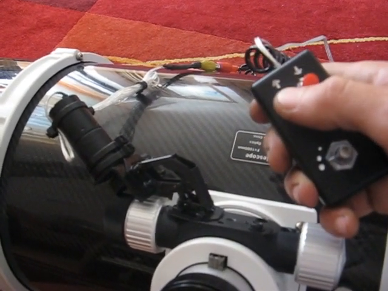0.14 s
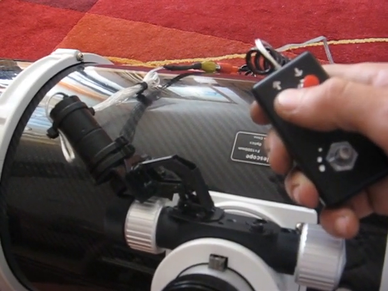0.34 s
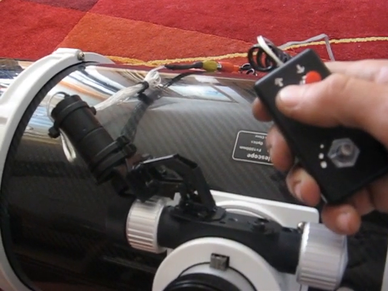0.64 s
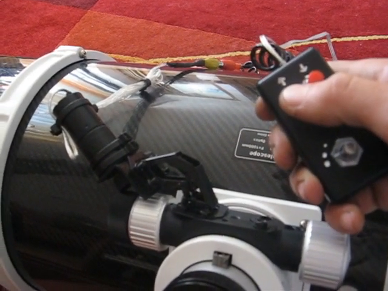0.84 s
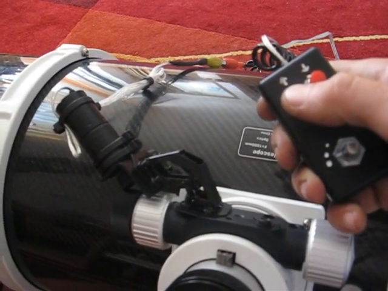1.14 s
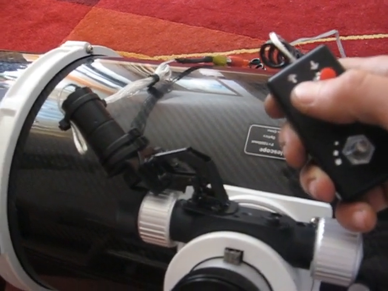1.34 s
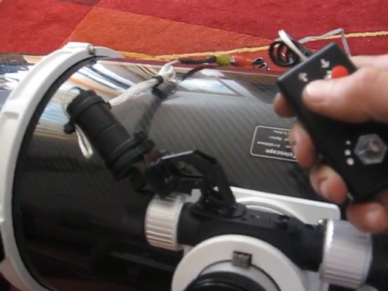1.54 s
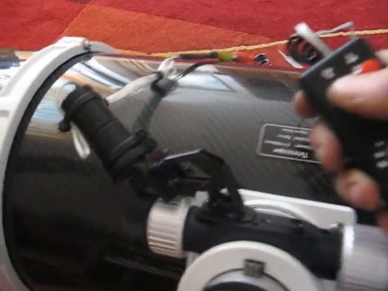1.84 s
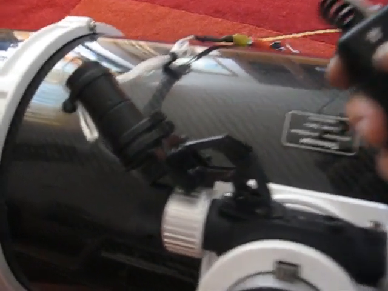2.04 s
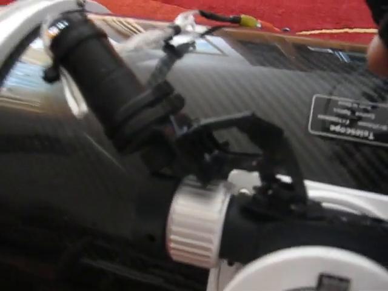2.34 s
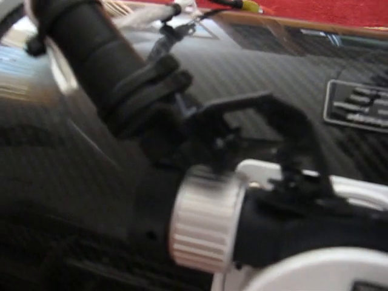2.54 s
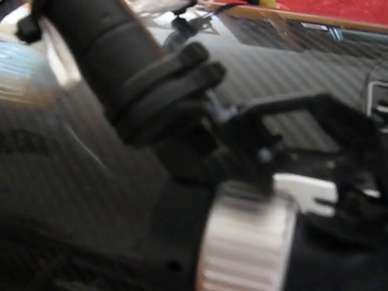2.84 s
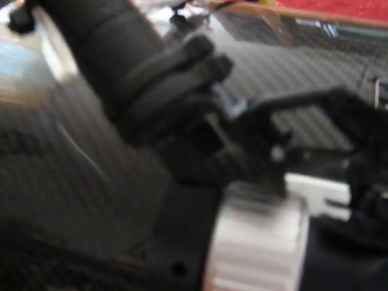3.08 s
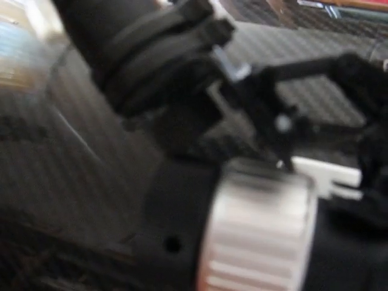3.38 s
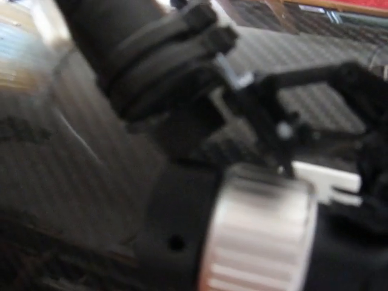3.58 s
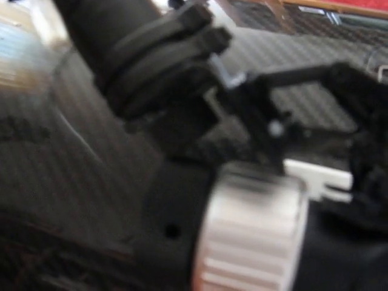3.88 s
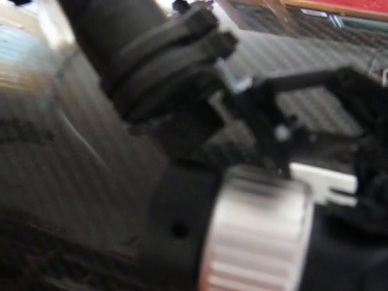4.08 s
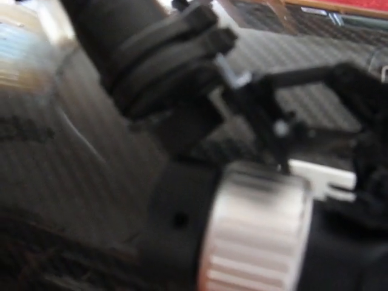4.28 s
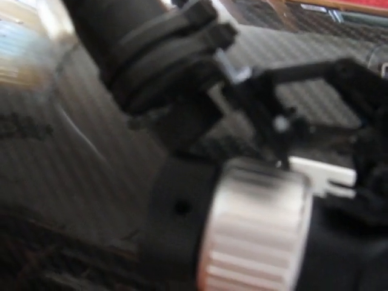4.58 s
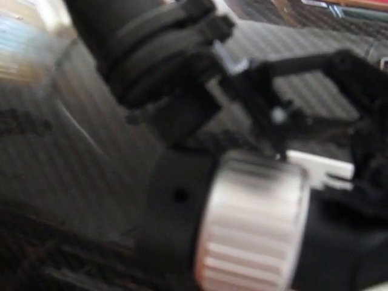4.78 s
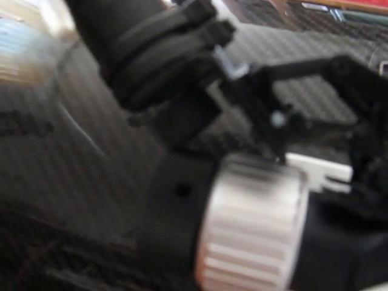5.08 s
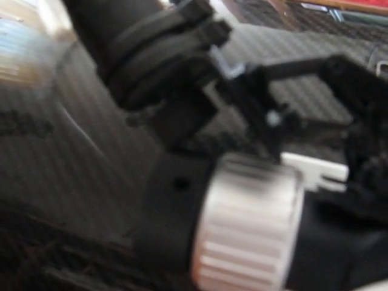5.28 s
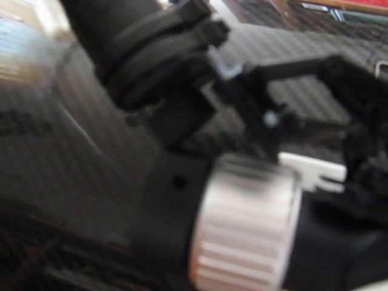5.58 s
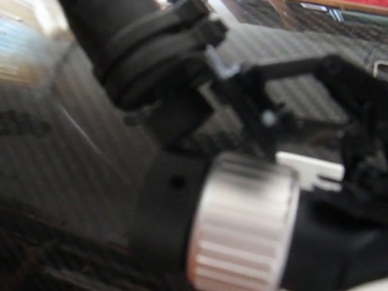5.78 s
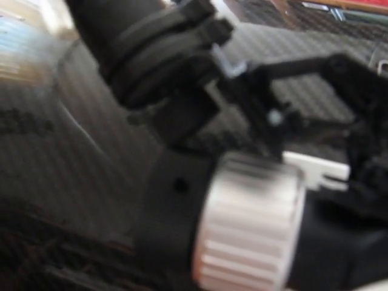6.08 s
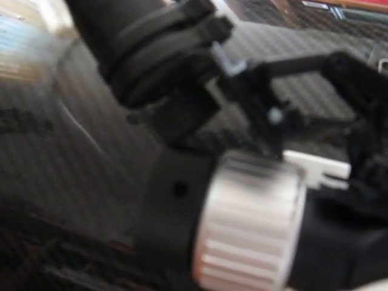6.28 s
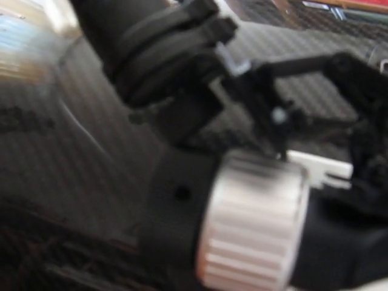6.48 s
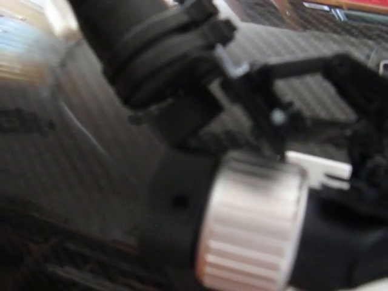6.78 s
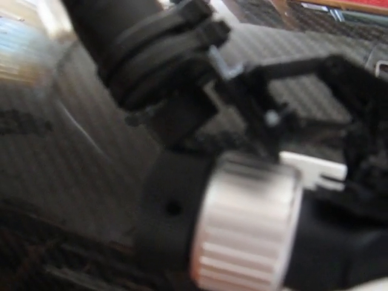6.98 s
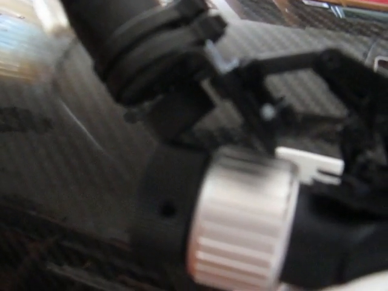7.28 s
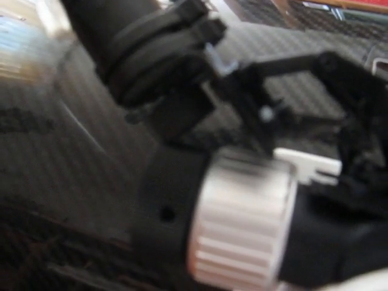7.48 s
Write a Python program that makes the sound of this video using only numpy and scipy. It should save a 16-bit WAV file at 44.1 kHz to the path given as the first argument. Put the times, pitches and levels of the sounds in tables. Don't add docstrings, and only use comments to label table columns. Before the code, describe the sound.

A little electric gearmotor buzzes beside a telescope tube, its plastic housing rattling rapidly over a steady gear whine. The microphone moves closer and the whir gets louder and fuller. A hard click stops it, smaller clicks follow in near silence, then the motor runs the other way with a drier, hissier rattle. A last bright click ends the run. Indoors, no audible room echo, crude gritty mono sound with broken faint tails.

```python
import sys
import numpy as np
from scipy import signal
from scipy.fft import rfft, irfft
from scipy.io import wavfile

SR = 44100
rng = np.random.default_rng(int(sys.argv[2]) if len(sys.argv) > 2 else 0)


def unload_wav(signal):
    wavfile.write(
        sys.argv[1],
        SR,
        np.round(np.clip(np.atleast_2d(signal).T, -1, 1) * 32767).astype(np.int16),
    )


def voltage_ratio(decibels):
    exponent = np.asarray(decibels, float) / 20
    return 10 ** exponent


N = 336483
REVERSE_ON_S = 5.755
TEETH = 12
STEP, SKIP = 1 / 128, 4


def rms_one(x):
    return x / np.sqrt(np.mean(x ** 2) + 1e-20)


def in_time(rows):
    s, *columns = np.transpose(rows)
    return [np.interp(np.arange(N) / SR, s, c) for c in columns]


def between(on_s, off_s):
    t = np.arange(N) / SR
    return (t >= on_s) & (t < off_s)


def window_db(from_s, to_s, db):
    fade_s = .15
    t = np.arange(N) / SR
    return db * np.clip(np.minimum(t - from_s, to_s - t) / fade_s + .5, 0, 1)


def drift(rate_hz):
    r = np.exp(-40 * np.pi * rate_hz / SR)
    noise = rng.standard_normal(N // 20 + 3002)
    slow = signal.lfilter([1], [1, -2 * r, r * r], noise)[3000:]
    return np.interp(np.arange(N) / 20, np.arange(len(slow)), rms_one(slow))


def resonance(x, hz, width_hz):
    r = np.exp(-np.pi * width_hz / SR)
    poles = [1, -2 * r * np.cos(2 * np.pi * hz / SR), r * r]
    return signal.lfilter([1, 0, -1], poles, x) * (1 - r * r) / 2


def sliding_resonance(x, hz, width_hz):
    spin = np.exp(2j * np.pi * np.cumsum(hz) / SR)
    r = np.exp(-np.pi * width_hz / SR)
    return 2 * np.real(spin * signal.lfilter([1 - r], [1, -r], x / spin))


def speed():
    t = np.arange(N) / SR
    forward = 93.07 - 2.0 * np.exp(-t / .1)
    forward += -.72 * np.exp(-t / 1.0) + .17 * (t > 3.6)
    reverse = 92.86 - 19.5 * np.exp(-np.maximum(t - REVERSE_ON_S, 0) / .06)
    return np.where(t < REVERSE_ON_S, forward, reverse)


def worn_teeth(turns):
    wear_turns = 30
    tooth = np.floor(TEETH * turns).astype(int)
    bite = signal.lfilter([1], [1, 1 / wear_turns - 1], rng.standard_normal((1000, TEETH)), axis=0)[100:]
    bite = bite - bite.mean(axis=1, keepdims=True)
    meets = np.diff(tooth, prepend=0) > 0
    return rms_one(meets * bite.ravel()[tooth])


def mode_coupling(housing, mode):
    # f/Hz, from/s, to/s, level/dB
    mode_rows = [(1130, 3.75, 4.9, 3), (1130, 5.5, 4.4, 4), (1750, 2.05, 2.8, 6), (1750, 4.3, 3.9, 1.5),
                 (1750, 4.75, 5.6, 4.5), (4574, 2.1, 2.8, -3), (5450, 2.15, 2.75, 2), (3740, 2.3, 2.85, 1),
                 (3700, 5.85, 5.9, 1), (3700, 6.02, 6.3, 2), (4780, 6.2, 6.8, -1.5), (3700, 6.55, 6.85, 1),
                 (4210, 5.7, 6.3, 0), (1130, 1.9, 3.7, -2.5), (2118, 2.3, 2.75, -1.5), (2890, 6.5, 7.7, 1),
                 (4210, 6.9, 7.1, 2.5)]
    modes_hz = np.array(housing)[:, 0]
    return sum(window_db(*row) for hz, *row in mode_rows if np.argmin(np.abs(modes_hz - hz)) == mode)


def rattle(turns, housing, near, ridge, once_db, twice_db, twice_rad, tooth_db, knock, worn_far, worn_near):
    swell_db = once_db * np.cos(2 * np.pi * turns) + twice_db * np.cos(4 * np.pi * turns + twice_rad)
    swell_db += .6 * np.cos(2 * np.pi * turns * .547) + .6 * np.cos(2 * np.pi * turns * .146)
    swell_db += .3 * drift(25)
    slide = rng.standard_normal(N) * voltage_ratio(tooth_db * np.cos(2 * np.pi * TEETH * turns))
    meets = np.diff(np.floor(TEETH * turns), prepend=0) > 0
    knocks = meets * rng.standard_normal(N) * voltage_ratio(1.5 * rng.standard_normal(N))
    worn = worn_far + near * (worn_near - worn_far)
    force = voltage_ratio(swell_db) * (slide + knock * rms_one(knocks)) + worn * worn_teeth(turns)
    loaded = np.argmin([abs(hz - ridge[0][1]) for hz, *_ in housing]) if ridge else None
    total = np.zeros(N)
    for k, (hz, width_hz, far_db, near_db) in enumerate(housing):
        if k == loaded:
            mode = sliding_resonance(force, *in_time(ridge), width_hz)
        else:
            mode = resonance(force, hz, width_hz)
        db = far_db + near * (near_db - far_db) + mode_coupling(housing, k) + .5 * drift(4)
        total += mode * voltage_ratio(db) * (-1) ** k
    return rms_one(total)


def coupling(multiple):
    order_rows = [(1, -1, .25, 5), (1, 2.75, 3.8, -3), (9, 2.85, 3.6, 2), (9, 2, 2.6, 2), (8, -1, 1.9, -3),
                  (8, 3.3, 5.2, 2), (3, -1, .25, 6), (5, -1, .15, 1), (48, -1, .3, 1), (48, 1.75, 2.1, 3),
                  (48, 1.4, 1.75, -2), (48, 2.15, 2.55, -4), (48, 2.55, 2.75, .5), (48, 2.8, 3.05, 1.5),
                  (44, 2.1, 3.3, 3), (44, 4.1, 5.6, -5), (47, 4, 5.6, -4), (9, 5.95, 6.3, 6),
                  (12, 5.9, 6.2, 3), (48, 3, 3.8, -1.5), (3, .3, .8, 3), (3, 1.9, 2.8, 8.5),
                  (8, 2, 3.25, 8.5), (15, 2.1, 5.6, 6), (4, 2.85, 5.6, 6), (5, 2.85, 5.6, -8),
                  (36, 3.5, 5.6, -4), (3, 3.85, 5.6, 4), (12, 3.8, 5.6, 3.5), (12, 4.55, 5.6, 1.3),
                  (13, 4.8, 5.6, 12), (14, 4.8, 5.6, 7), (3, 6.25, 7.13, 13.5), (3, 1.6, 1.95, 2),
                  (9, 3.1, 3.7, 2), (12, 2, 3.6, 1.5), (14, 1.2, 2.8, 3), (10, 2, 3.5, 2),
                  (5, 6.3, 7.12, 8), (4, 6.3, 7.1, 4), (9, 6.7, 7.6, 4), (13, 5.7, 6.2, -5),
                  (13, 6.2, 7.6, 1.5), (13, 2, 3.6, -4), (8, 4.6, 5.6, -6), (9, 4.4, 5.6, -5),
                  (12, 4.75, 5.6, 1)]
    return sum(window_db(*row) for k, *row in order_rows if round(k) == multiple)


def whine(turns, main_orders, side_orders, rattle_db, near, live):
    orders = [(round(k), far_db + near * (near_db - far_db)) for k, far_db, near_db in main_orders]
    orders += [(round(k), far_db + near * (near_db - far_db) + 1.5 * drift(0.99))
               for k, far_db, near_db in side_orders]
    rough_db = .35 * coupling(TEETH) * drift(90)
    out = np.zeros(N)
    for k, order_db in orders:
        db = rattle_db + order_db + coupling(k) + (.5 + .02 * k) * drift(15) + rough_db * (k == TEETH)
        phase = 2 * np.pi * (k * turns[live] + rng.random())
        out[live] += np.sqrt(2) * voltage_ratio(db[live]) * np.sin(phase)
    return out


def rumble():
    # f/Hz, level/dB per Hz
    spectrum = np.array([(8.8, -40), (15, -11), (92, -8), (226, -10.5), (279, -8), (995, -11),
                         (1100, -12.5), (1200, -13.5), (2200, -7), (2860, -37.5), (4840, -120)])
    hz = np.maximum(np.arange(N // 2 + 1) * SR / N, 1)
    shape = voltage_ratio(np.interp(np.log(hz), np.log(spectrum[:, 0]), spectrum[:, 1]))
    shape = shape / np.sqrt(np.sum(shape[(hz > 550) & (hz < 700)] ** 2)) * np.sqrt(N / 2)
    return irfft(rfft(rng.standard_normal(N)) * shape, N) * voltage_ratio(1.2 * drift(12))


def motor(levels, housing, on_s, off_s, main_orders, side_orders, first_turn, rumble_db, **texture):
    rattle_db, near = in_time(levels)
    near = np.clip(near, 0, 1)
    turns = first_turn + np.cumsum(speed() * (1 + .0004 * drift(20))) / SR
    seat_db = (on_s > 0) * -19 * np.exp(-np.maximum(np.arange(N) / SR - on_s, 0) / .13)
    live = between(on_s, off_s)
    tones = whine(turns, main_orders, side_orders, rattle_db + seat_db, near, live)
    noise = rattle(turns, housing, near, **texture) + voltage_ratio(rumble_db) * rumble()
    return (voltage_ratio(rattle_db) * noise + tones) * live


def forward_run():
    # t/s, rattle level/dB, nearness [0 far - 1 near]
    levels = [(0, -49.5, 0.24), (.15, -42.5, 0.29), (.6, -37, 0.23), (1.6, -36, 0.35), (2, -34, 0.54),
              (2.4, -32, 0.66), (2.7, -31, .7), (3.1, -32.5, .88), (3.7, -32.5, 0.85), (4.1, -32, 0.84),
              (4.6, -32.5, 0.93), (5.41, -31.5, 0.83)]
    # f/Hz, width/Hz, far level/dB, near level/dB
    housing = [(1287, 500, -22.5, -20.5), (2116, 440, -10, -16), (2925, 430, -8, -3), (3326, 300, -3.5, -5),
               (3720, 340, -4, -4), (4602, 270, -3.5, -5.5), (4840, 230, -6, -4), (5140, 250, -3.5, -9),
               (5452, 260, -17, -9), (1770, 500, -25, -24.5), (1128, 82, -28.5, -21)]
    # shaft multiple, far level/dB, near level/dB re rattle
    main_orders = [(1, -21, -27.5), (3, -20, -28), (5, -18.5, -26), (12, -16.5, -14.5), (36, -14, -14),
                   (48, -3.5, -12)]
    side_orders = [(2, -32.5, -33.5), (4, -36, -35), (8, -30, -33), (9, -22, -30), (10, -30, -31),
                   (13, -30.5, -30), (14, -31.5, -33), (15, -37, -32), (16, -28, -34), (24, -31, -25),
                   (40, -17, -21), (44, -20, -22), (47, -28, -27), (38, -21, -25), (45, -23, -28),
                   (50, -22, -27), (49, -18, -24), (60, -36, -16)]
    return motor(levels, housing, 0, 5.4135, main_orders, side_orders,
                 first_turn=.4, rumble_db=-27.5, ridge=[], once_db=.8, twice_db=1.1, twice_rad=1,
                 tooth_db=3, knock=.4, worn_far=.55, worn_near=.15)


def coasting():
    # t/s, length/s, first level/dB, t60/s, last level/dB
    coasts = [
        (5.412, .036, -43, .025, -54.5),
        (5.708, .007, -46, .03, -56),
        (5.7565, .04, -53, .05, -54),
        (7.52, .085, -43, .11, -53),
    ]
    t = np.arange(N) / SR
    level = np.zeros(N)
    for s, length_s, first_db, t60_s, last_db in coasts:
        fall = voltage_ratio(first_db - 60 * np.maximum(t - s, 0) / t60_s)
        level += (fall + voltage_ratio(last_db)) * between(s, s + length_s)
    return level * rms_one(resonance(rng.standard_normal(N), 3500, 2500))


def ring(db, hz, t60_s):
    t = np.arange(SR // 20) / SR
    return voltage_ratio(db - 60 * t / t60_s) * np.sin(2 * np.pi * hz * t) * (1 - np.exp(-t / .0003))


def clicks():
    # t/s, ring peak level/dB, ring f/Hz, push level/dB, bounce level/dB
    click_rows = [(5.4125, -14, 2400, -26, -60), (5.4134, -13, 3500, -26, -28),
                  (5.5358, -35, 3000, -60, -60), (5.5369, -25, 3500, -60, -60),
                  (5.5374, -19, 3200, -60, -26), (5.5375, -18, 1500, -28, -60),
                  (5.5376, -27, 4950, -60, -60), (5.5401, -29, 3900, -60, -60),
                  (5.7067, -10, 4000, -60, -34), (5.7068, -20, 2800, -60, -60),
                  (5.7099, -34, 2500, -35, -36), (7.5198, -22, 3000, -23, -60),
                  (7.5214, -6.5, 3700, -36, -28)]
    # share of ring f, level/dB
    button = [(1, 0), (1.45, -14), (.7, -9), (.3, -17)]
    # share of ring f, level/dB
    bounces = [(1.12, 0), (1.05, 1), (.97, -6)]
    push_s, ring_s, bounce_s = .001, .0037, .0013
    out, t = np.zeros(N), np.arange(SR // 20) / SR
    for k, (s, ring_db, hz, push_db, bounce_db) in enumerate(click_rows):
        fall_s = push_s * (3 if k == 0 else .6)
        push = -voltage_ratio(push_db + 3) * np.exp(-t / fall_s) * (1 - np.exp(-t / .0005))
        struck = sum(ring(ring_db + db, share * hz, ring_s) for share, db in button)
        out[round(s * SR):][:len(t)] += push + struck
        for n, (share, db) in enumerate(bounces, start=1):
            out[round((s + n * bounce_s) * SR):][:len(t)] += ring(bounce_db + db, share * hz, ring_s)
    return out


def creep():
    # t/s, direction [+1 or -1]
    ticks = [(5.7189, 1), (5.7214, 1), (5.7226, -1), (5.7288, -1), (5.7314, -1), (5.7411, 1), (5.7457, 1),
             (5.749, 1), (5.7496, 1), (5.755, 1)]
    out = np.zeros(N)
    for s, direction in ticks:
        out[round(s * SR) - 2:][:SKIP] += direction * STEP
    return out


def reverse_run():
    # t/s, rattle level/dB, nearness [0 far - 1 near]
    levels = [(5.755, -62, 0.7), (5.79, -46.5, 0.75), (5.86, -42.5, 0.76), (5.91, -38.5, 1),
              (6.1, -33, 0.79), (6.5, -33, 0.94), (6.95, -33, 0.8), (7.15, -32, 0.35), (7.52, -32.5, 0.13)]
    # f/Hz, width/Hz, far level/dB, near level/dB
    housing = [(1325, 230, -22.5, -27), (2217, 280, -13.5, -15), (2857, 300, -7, -5.5),
               (3522, 320, -1.5, -3.5), (3700, 270, -2.5, -0.5), (4250, 300, -10, -10.5),
               (4776, 200, -8.5, -7), (5200, 300, -10.5, -11.5), (5530, 220, -13, -12),
               (1744, 500, -24, -23.5)]
    # shaft multiple, far level/dB, near level/dB re rattle
    main_orders = [(1, -35, -35), (3, -42, -33), (5, -38, -37), (12, -22.5, -22), (36, -14, -15),
                   (48, -28, -30)]
    side_orders = [(4, -39, -34.5), (9, -34.5, -33.5), (13, -30, -29), (23, -23.5, -27.5),
                   (24, -22.5, -21.5), (26, -26.5, -29.5), (34, -22.5, -27), (35, -23.5, -21.5),
                   (37, -25, -19), (38, -25.5, -23.5), (58, -24.5, -30), (50, -31, -24), (59, -28.5, -28.5)]
    # t/s, f/Hz
    ridge = [(5.75, 3746), (5.9, 3830), (5.97, 3790), (6.3, 3700), (6.42, 3810), (6.55, 3773), (6.8, 3780),
             (7.03, 3937), (7.15, 3765), (7.6, 3760)]
    return motor(levels, housing, REVERSE_ON_S, 7.5215, main_orders, side_orders,
                 first_turn=.47, rumble_db=-29.5, ridge=ridge, once_db=4, twice_db=1.0, twice_rad=3,
                 tooth_db=6, knock=.1, worn_far=.2, worn_near=.25)


def squeal():
    on_s, from_hz, to_hz, climb_s = 5.775, 4400, 5300, .06
    top_db, top_s, fade_db_per_s = -54, 5.815, 160
    t = np.arange(N) / SR
    hz = to_hz + (from_hz - to_hz) * np.exp(-np.maximum(t - on_s, 0) / climb_s)
    tone = np.sin(2 * np.pi * np.cumsum(hz * (1 + .012 * drift(150))) / SR)
    db = top_db - fade_db_per_s * np.maximum(np.abs(t - top_s) - .015, 0) + 4 * drift(60)
    return np.sqrt(2) * voltage_ratio(db) * tone


def backlash():
    # t/s, level/dB
    take_up = [
        (5.8195, -33),
        (5.863, -39),
        (5.877, -33),
        (5.889, -32),
    ]
    # f/Hz, level/dB, t60/s
    gear = [(3850, 0, .025), (2900, -3, .02)]
    out = np.zeros(N)
    for s, knock_db in take_up:
        out[round(s * SR):][:SR // 20] += sum(ring(knock_db + db, hz, t60_s) for hz, db, t60_s in gear)
    return out


def scene():
    first = forward_run() + coasting() + clicks() + creep()
    second = reverse_run() + squeal() + backlash()
    return np.tile(first + second, (2, 1))


def roll_off(x):
    return signal.sosfilt(signal.butter(12, 7400, fs=SR, output="sos"), x)


def record(dry):
    kept = np.zeros_like(dry)
    kept[:, 3::SKIP] = np.round(dry[:, 3::SKIP] / STEP) * STEP
    kernel = SKIP * signal.firwin(65, 5480, window=("kaiser", 9), fs=SR)
    mix = signal.oaconvolve(kept, kernel[None], mode="same")
    return roll_off(mix)


dry = scene()
out = record(dry)
unload_wav(out)
```